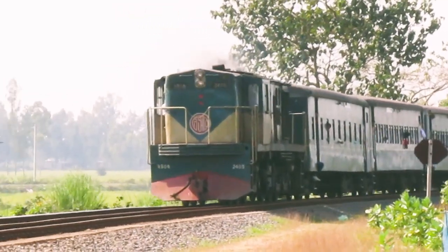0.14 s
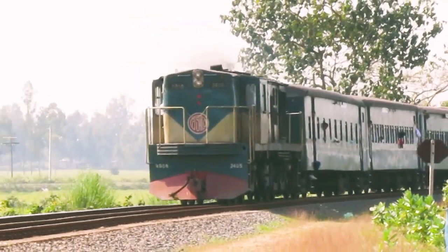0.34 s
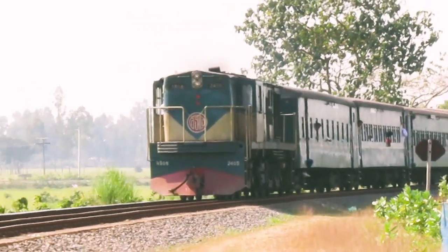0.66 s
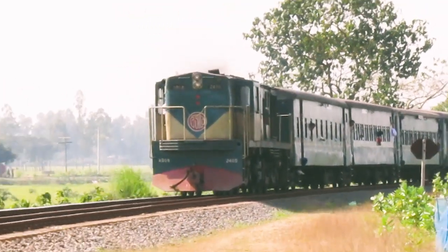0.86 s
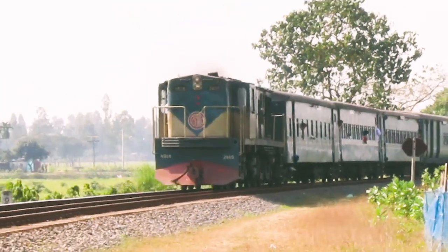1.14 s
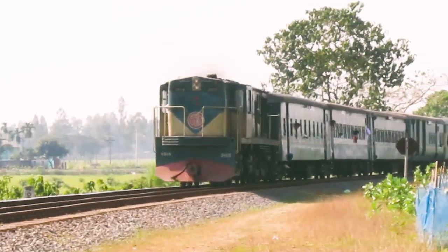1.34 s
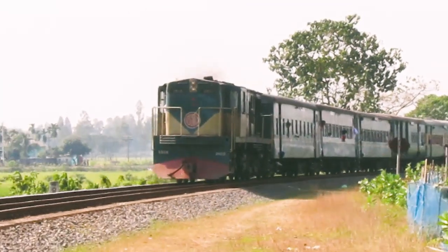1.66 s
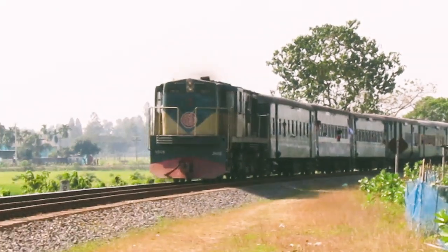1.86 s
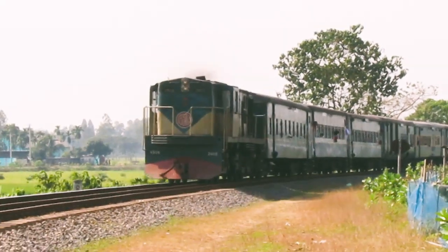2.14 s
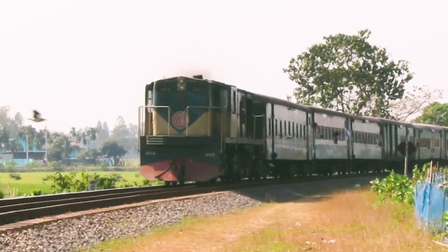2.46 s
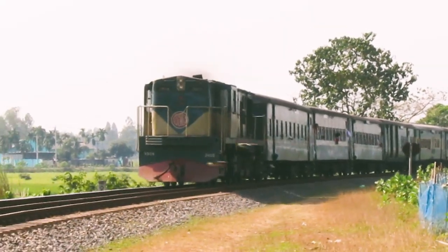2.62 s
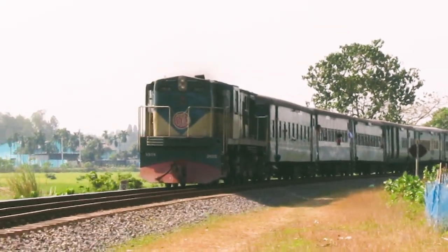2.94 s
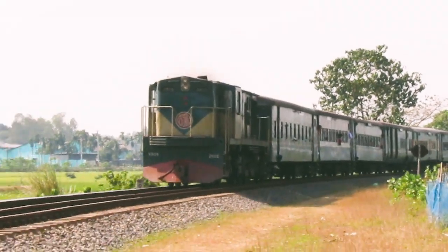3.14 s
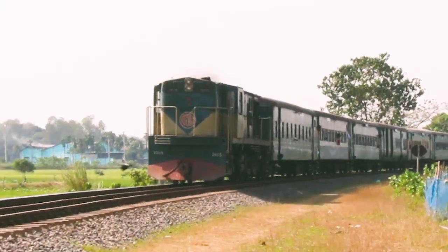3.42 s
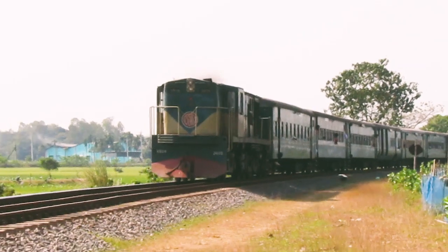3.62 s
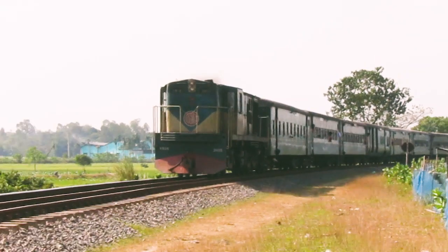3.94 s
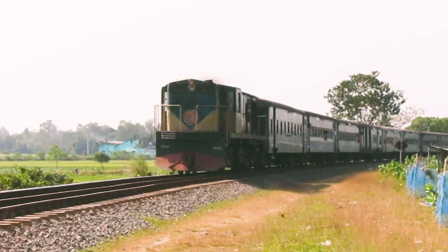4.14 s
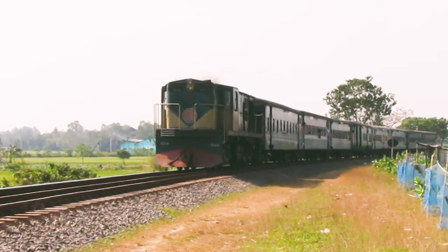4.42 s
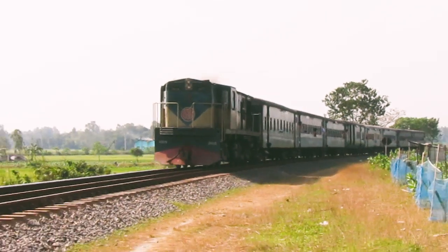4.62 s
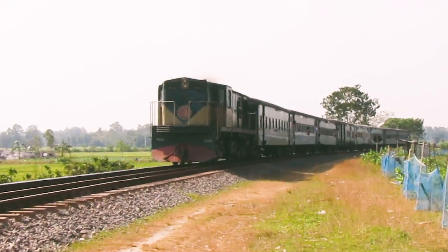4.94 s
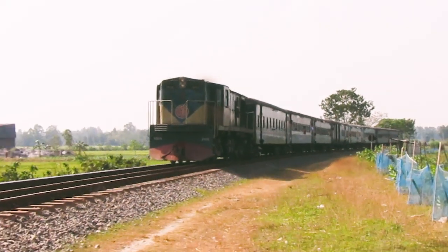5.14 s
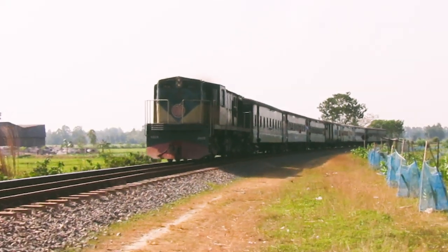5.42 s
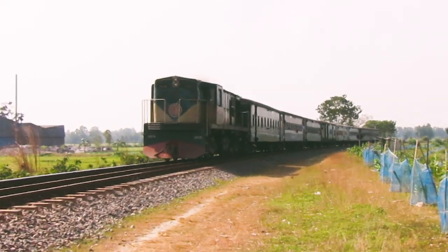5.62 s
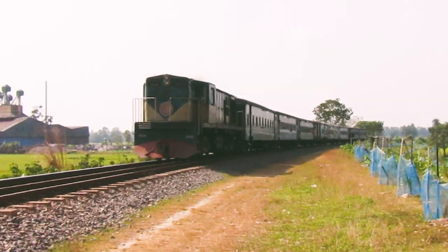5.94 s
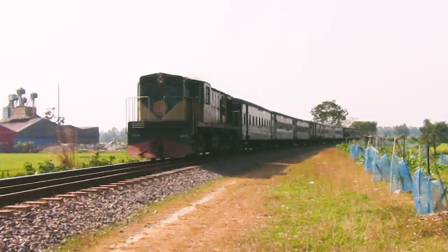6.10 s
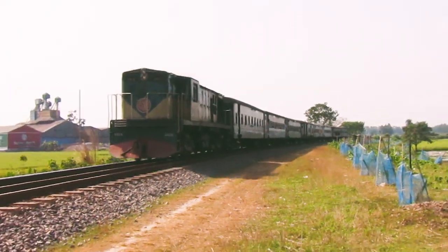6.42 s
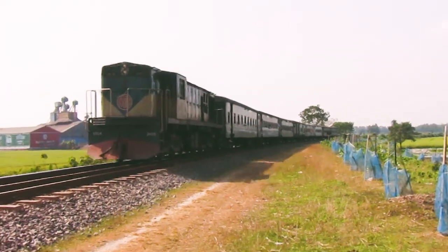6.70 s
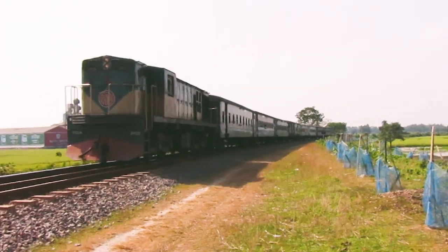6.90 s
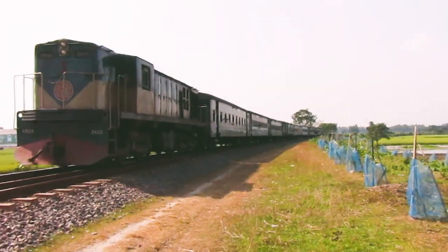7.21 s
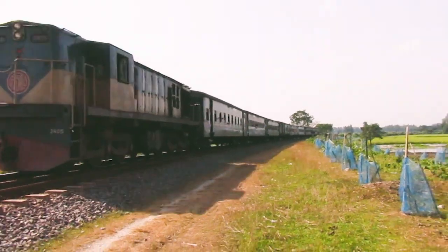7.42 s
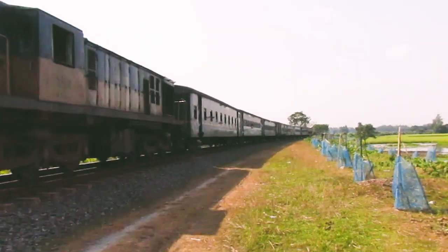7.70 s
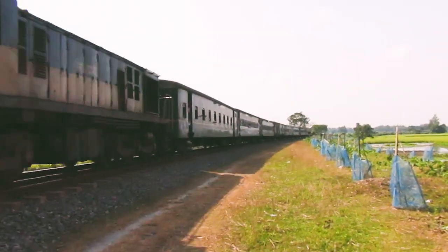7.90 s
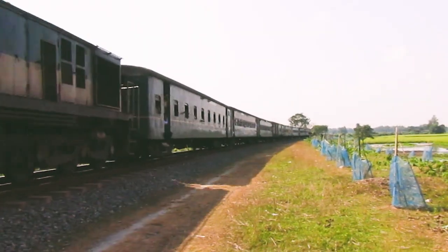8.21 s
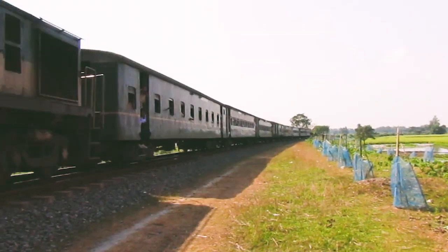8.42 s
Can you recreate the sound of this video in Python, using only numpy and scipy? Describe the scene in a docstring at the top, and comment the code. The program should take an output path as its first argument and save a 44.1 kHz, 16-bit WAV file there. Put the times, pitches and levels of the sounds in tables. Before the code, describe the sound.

Outdoors beside a curved railway, a fixed microphone about nine metres from the line hears a diesel train approach. Faint chugging, soft hiss and wavering whines come first, with two very brief clicking dropouts. Steel clanks begin, the high rail sizzle steps up, and exhaust rumble, throbs and wheel roar keep growing until the locomotive is abreast, loud and droning, at the end.

```python
"""Beside a curved railway track, the microphone 9 m off the line. A diesel locomotive with coaches starts
over 100 m away: a chug over deep exhaust rumble, a whine, wheel roar, early hiss and wavering, whining tones.
At 0.5 s and 3 s the level dips briefly with a click; between them clanks begin, and the rail sizzle steps up.
The early hiss fades; engine, roar and sizzle grow as the train nears, until it is abreast at 8.4 s.
Tones and decaying bursts make the engine, whines and blows; shaped noise makes the roar, hiss and sizzle."""
import sys
import numpy as np
from scipy import signal
from scipy.fft import rfft, irfft, next_fast_len
from scipy.io import wavfile
from scipy.ndimage import uniform_filter1d, minimum_filter1d, map_coordinates

SR = 44100
rng = np.random.default_rng(int(sys.argv[2]) if len(sys.argv) > 2 else 0)


def transcribe(signal):
    """Save signal, clipped to [-1, 1], as a 16-bit WAV file at the path in sys.argv[1]."""
    frames = np.atleast_2d(signal).T
    limited = np.clip(frames, -1, 1)
    pcm = np.round(limited * 32767).astype(np.int16)
    wavfile.write(sys.argv[1], SR, pcm)


N = 377055
T = np.arange(N) / SR  # seconds
HZ = np.fft.rfftfreq(N, 1 / SR)

# the pass: train speed, microphone's distance from the track, moment when the engine room is abreast
SPEED_M_PER_S, TRACK_M, ABREAST_S = 13.7, 9, 8.4
# the long train is at full level within CLOSE_M and has lost its far loss at FAR_M
CLOSE_M, FAR_M = 32.9, 113.6


def amp(db):
    """Decibels to gain."""
    return 10 ** (np.asarray(db) / 20)


def unit(x):
    """Scales to rms 1."""
    return x / np.sqrt(np.mean(x ** 2) + 1e-20)


def white():
    """Plain noise."""
    return rng.standard_normal(N)


def drift(per_s):
    """Slow chance of rms 1 that heads for a new value per_s times a second."""
    values = rng.standard_normal(4000)
    return unit(map_coordinates(values, [T * per_s], order=1, mode="wrap"))


def grains(per_s, spread_db):
    """Tiny impacts at random moments, at rms 1; a few are much larger than the rest."""
    sizes = amp(spread_db * np.minimum(rng.exponential(1, N), 4))
    struck = rng.random(N) < per_s / SR
    return unit(np.sign(white()) * sizes * struck)


def filtered(x, spectrum):
    """Passes x through a filter given as (Hz, dB) points."""
    hz, db = np.transpose(spectrum)
    size = next_fast_len(N + 4096)
    bins = np.fft.rfftfreq(size, 1 / SR)
    gain = amp(np.interp(np.log(bins + 1), np.log(hz), db))
    return irfft(rfft(x, size) * gain, size)[:N]


def colour(x, spectrum):
    """Gives x a spectrum, at rms 1."""
    return unit(filtered(x, spectrum))


def bell(x, centre, spread):
    """Smooth bell curve with peak 1; spread is its standard deviation."""
    return np.exp(-.5 * ((x - centre) / spread) ** 2)


def blend(a, b, share):
    """Goes from a to b as share goes from 0 to 1."""
    share = np.clip(share, 0, 1)
    return (1 - share) * a + share * b


def add(mix, s, sound):
    """Mixes a sound in at time s."""
    part = mix[max(round(s * SR), 0):][:len(sound)]
    part += sound[:len(part)]


def swells(rows):
    """Gain in dB of smooth, bell-shaped swells and sags."""
    return sum(db * bell(T, s, spread_s) for s, spread_s, db in rows)


def distance(abreast_s=ABREAST_S):
    """Metres to the microphone from the part of the locomotive that is abreast at that moment."""
    return np.hypot(SPEED_M_PER_S * (abreast_s - T), TRACK_M)


def doppler():
    """Factor on pitch: 1 far ahead, sinking as the locomotive draws level."""
    mach = SPEED_M_PER_S / 343
    closing = SPEED_M_PER_S * (ABREAST_S - T) / distance()  # share of the speed that points at the microphone
    return (1 - mach) / (1 - mach * closing)


def side_on(sharpness=1.37):
    """How far the locomotive's side faces the microphone, 0-1."""
    return (TRACK_M / distance()) ** sharpness


def approach(close_db, far_db, bend):
    """Level in dB of a sound that grows as the train comes up and holds once it is close."""
    far = np.maximum((distance() - CLOSE_M) / (FAR_M - CLOSE_M), 0)
    return close_db - far_db * far ** bend


CYCLE_HZ = 5.512  # four-stroke cycles per second, before Doppler
# exhaust level close by (dB), loss far away (dB), bend of that loss (1 = even in dB)
EXHAUST_DB, EXHAUST_FAR_DB, EXHAUST_BEND = -16, 18.5, 2.32
# Steady engine tones. Each row: multiple of the four-stroke cycle rate, relative level in dB.
ENGINE_ORDERS = [(12, -12), (16, -4.5), (19, -2.5), (21, -15), (23, -4), (26, -23), (28, -1.5), (29, -2),
                 (30, -11), (32, -9), (33, -3.5), (34, -10), (35, -10.5), (36, -8), (37, -8), (40, -6.5)]
# Cylinders that bark above the rest.
# Each row: place in the cycle 0-1, pitch in Hz before Doppler, rise time in seconds, relative level in dB.
CHUFFS = [(0.193, 242, 0.013, 3), (.52, 336.6, 0.0053, -5), (0.544, 181.5, 0.0066, 8.5),
          (.87, 154.4, 0.014, -1.5)]
# Exhaust rumble heard from ahead and from beside. Each row: frequency in Hz, relative level in dB per Hz.
RUMBLE_AHEAD = [(26, -50), (45, -27.5), (92, -5), (161, 0), (241, -7), (268, -13), (335, -9.5), (380, -23),
                (490, -63), (840, -120)]
RUMBLE_BESIDE = [(24, -61), (40, -34), (51, -30), (84, -21), (123, 1), (151, 0.5), (204, 1), (253, -9.5),
                 (381, -1), (438, -17), (520, -42), (680, -39), (1140, -120)]
# The exhaust surges and eases. Each row: centre in seconds, bell spread in seconds, gain in dB.
SURGES = [(1.45, 0.13, 1.5), (2, 0.14, 1.5), (3.5, 0.036, 0.5), (3.8, .15, -1.5), (6.05, 0.14, 1)]


def engine(tones_db=-5, chuffs_db=-6, rumble_db=-3, uneven_db=0.0, wander=0.074, throb_db=0.33,
           screened_db=-4, floor_hz=52):
    """The exhaust repeats every two crank turns: steady tones, barking cylinders and turbulent gas."""
    beside = side_on()
    cycles = np.cumsum(CYCLE_HZ * doppler()) / SR
    tones = np.zeros(N)
    for k, db in ENGINE_ORDERS:
        phase = 2 * np.pi * (k * cycles + rng.random()) + wander * drift(4.6)
        tones += amp(db) * np.cos(phase)
    chuffs = np.zeros(N)
    for place, hz, rise_s, db in CHUFFS:
        age = (cycles - place) % 1 / CYCLE_HZ  # time since this cylinder last fired
        pulse = age / rise_s * np.exp(1 - age / rise_s)
        chuffs += amp(db + uneven_db * drift(5.4)) * pulse * np.sin(2 * np.pi * hz * age)
    beat = amp(tones_db) * unit(tones) + amp(chuffs_db) * chuffs
    beat *= amp(screened_db * beside)  # the hood hides the stack
    gas = white() * amp(throb_db * drift(30))
    rumble = blend(colour(gas, RUMBLE_AHEAD), colour(gas, RUMBLE_BESIDE), beside)
    level_db = approach(EXHAUST_DB, EXHAUST_FAR_DB, EXHAUST_BEND) + swells(SURGES)
    exhaust = amp(level_db) * (beat + amp(rumble_db) * rumble)
    high_pass = signal.butter(4, floor_hz, "high", fs=SR, output="sos")
    return signal.sosfilt(high_pass, exhaust)


BLOWER_HZ = 200.4  # before Doppler
# The blower's whine. Each row: multiple of its pitch, loudest moment in seconds, level then in dB,
# loss in dB per tenfold distance.
WHINE_ORDERS = [(1, 8.9, -29.5, 56), (2, 8.52, -32.5, 65), (4, 7.3, -36.5, 22), (6, 8.73, -32.5, 50),
                (8, 9, -36, 17.5)]


def machinery(waver=0.00702, flutter=0.41, drone_db=-31, drone_hz=365, drone_width_hz=35):
    """The engine room drones through its side; the blower whines unsteadily and sinks in pitch as it passes."""
    pitch = BLOWER_HZ * doppler()
    drone = unit(irfft(rfft(white()) * bell(HZ, drone_hz, drone_width_hz), N))
    whine = np.zeros(N)
    for k, s, db, loss_db in WHINE_ORDERS:
        wobble = 1 + waver * 2 / np.sqrt(k) * drift(60)  # low tones are the least steady
        tone = np.sin(2 * np.pi * np.cumsum(k * pitch * wobble) / SR)
        tone *= 1 + flutter * drift(30)
        level_db = db - loss_db * np.log10(distance(s) / TRACK_M)
        whine += amp(level_db) * unit(tone)
    return whine + amp(drone_db) * side_on() * drone


# wheel roar level close by (dB), loss far away (dB), bend of that loss
ROAR_DB, ROAR_FAR_DB, ROAR_BEND = -24.5, 17, 1.79
# Wheel roar far off and near the microphone. Each row: frequency in Hz, relative level in dB per Hz.
ROAR_FAR = [(240, -44), (400, -10), (532, -4.5), (582, -16.5), (671, -1), (803, -5), (879, 0.5), (940, -2),
            (1310, -15), (1380, -15.5), (1540, -9.5), (1630, -17), (1740, -27), (2180, -35.5), (2400, -78),
            (3120, -82), (5280, -120)]
ROAR_NEAR = [(250, -56), (420, 0), (497, 0), (575, -10), (775, 0.5), (903, -0.5), (986, -3), (1180, -7),
             (1300, -10.5), (1380, -10), (1530, -12), (1570, -16), (1680, -14), (2090, -19), (2400, -37),
             (3120, -55), (5280, -120)]
# The roar swells and eases with the state of the rail.
# Each row: centre in seconds, bell spread in seconds, gain in dB.
ROAR_SWELLS = [(1.7, 0.24, 2), (6.15, 0.14, 1), (6.9, 0.25, -2.5)]


def wheels(near_m=21, widening=1.96, rattle=0.34, flutter_db=1.06):
    """Rough treads roll and rattle on the rail; the roar widens as the train comes near."""
    near = (near_m / distance()) ** widening
    contact = white() + rattle * grains(per_s=260, spread_db=0.5)
    contact *= amp(flutter_db * drift(45))
    roar = blend(colour(contact, ROAR_FAR), colour(contact, ROAR_NEAR), near)
    level_db = approach(ROAR_DB, ROAR_FAR_DB, ROAR_BEND) + swells(ROAR_SWELLS)
    return amp(level_db) * roar


def ring(x, share, t60):
    """Long steel answers with a thicket of narrow modes, made as a decaying noise tail."""
    t = np.arange(SR // 6) / SR
    tail = rng.standard_normal(len(t)) * amp(-60 * t / t60)
    return x + share * signal.oaconvolve(x, tail / np.linalg.norm(tail))[:N]


# The rails ring high in the sizzle. Each row: frequency in Hz, half width in Hz, relative level in dB.
RAIL_MODES = [(6140, 60, -25), (9750, 60, -11), (10460, 90, -12), (11790, 20, -20), (12300, 40, -16),
              (12376, 30, -18), (12715, 35, -21), (13400, 40, -23)]


def rail_ring():
    """Noise in the narrow, high modes of the rails."""
    shape = np.zeros(len(HZ))
    for hz, width, db in RAIL_MODES:
        shape += amp(db) / np.sqrt(width) / (1 + ((HZ - hz) / width) ** 2)
    return unit(irfft(rfft(white()) * shape, N))


# running gear hiss: level abreast (dB), loss with distance (dB per m)
GEAR_DB, GEAR_DB_PER_M = -39.5, 0.4
# rail sizzle: level close by (dB), loss far away (dB), bend of that loss
SIZZLE_DB, SIZZLE_FAR_DB, SIZZLE_BEND = -44, 13, 1.8
# the sizzle steps up as the flanges bite in the curve: moment (s), time constant (s), step (dB)
BITE_S, BITE_RISE_S, BITE_DB = 2.65, 0.054, 6.5
# Running gear hiss, rail sizzle, and a broad hiss that fades from the first dip on.
# Each row: frequency in Hz, relative level in dB per Hz.
HISS = [(1590, -20), (2700, -0.5), (3160, 0), (4200, -4), (5900, 1.5), (6340, -1), (7840, 2), (8420, 1),
        (9500, -2.5), (12500, -20), (14800, -28)]
SIZZLE = [(2700, -30), (3400, -18), (5200, -18.5), (6200, -12.5), (7000, -13.5), (7960, -9.5), (9300, -0.5),
          (10100, -0.5), (10800, 0), (11700, -7.5), (12900, -12.5), (14800, -19.5)]
EARLY_HISS = [(1000, 3), (1900, 9.5), (2400, -6.5), (3000, -0.5), (4500, -7), (6200, -4.5), (8000, -7.5),
              (10300, -5), (11500, -15), (14800, -20)]
# The gear hisses harder in the curve and on nearing.
# Each row: centre in seconds, bell spread in seconds, gain in dB.
GEAR_SWELLS = [(2.4, 0.7, 7), (4.8, 0.23, 2), (6.9, 0.14, 2.5), (8.55, 0.11, 2)]
# Flanges rub and let go, and the sizzle swells and eases.
# Each row: centre in seconds, bell spread in seconds, gain in dB.
RUBS = [(3.52, 0.029, 3), (4.05, 0.074, 1.5), (5.3, 0.11, 4), (5.65, 0.1, 7), (6.19, 0.12, 7),
        (6.55, 0.074, 7), (6.88, .15, -2), (7.36, 0.082, 4.5), (8.15, 0.19, -0.5)]


def rails(hiss_crackle=0.48, sizzle_crackle=0.66, flicker_db=1.0, early_db=-51.0, early_fade_db_per_s=75,
          ringing_db=-9):
    """The running gear hisses, and the rails carry a high, ringing sizzle ahead of the wheels."""
    gear_db = GEAR_DB - GEAR_DB_PER_M * (distance() - TRACK_M) + swells(GEAR_SWELLS)
    unbitten = .5 - .5 * np.tanh((T - BITE_S) / BITE_RISE_S)
    rail_db = approach(SIZZLE_DB, SIZZLE_FAR_DB, SIZZLE_BEND) - BITE_DB * unbitten + swells(RUBS)
    gear_contact = white() + hiss_crackle * grains(per_s=350, spread_db=1.0)
    hiss = colour(ring(gear_contact, share=0.26, t60=0.081), HISS)
    rail_contact = white() + sizzle_crackle * grains(per_s=700, spread_db=1.0)
    sizzle = colour(ring(rail_contact, share=0.33, t60=0.07), SIZZLE)
    track = amp(gear_db) * hiss + amp(rail_db) * (sizzle + amp(ringing_db) * rail_ring())
    first_start, first_end = DIPS[0][:2]
    fade_in = np.clip(T / first_end, 0, 1)  # full by the end of the first dip
    fade_db = early_fade_db_per_s * np.maximum(T - first_start, 0)
    early = amp(early_db - fade_db) * colour(white(), EARLY_HISS)
    return (early + track * fade_in) * amp(flicker_db * drift(60))


# Whining tones near 800, 1550 and 3100-3600 Hz. Each row: loudest moment in seconds,
# bell spread in seconds, pitch in Hz, glide in Hz per second, level in dB.
WHINING_TONES = [(.6, .6, 1590, 0, -54.5), (1.9, .5, 1570, 0, -50), (3.274, 0.51, 1574, 0.5, -43),
                 (7.2, .33, 797, -8, -32), (7.75, 0.09, 794, -20, -29), (8.34, 0.13, 774, -80, -30),
                 (8.2, 0.035, 3565, 0, -50), (8.03, 0.055, 1572, -40, -30.5), (8.23, .07, 1577, -60, -36),
                 (8.385, .028, 1530, 0, -32), (8.52, 0.05, 1545, -80, -36), (8.523, .06, 3090, -160, -49.5)]


def whining_tones(waver=0.009, flutter_db=2.2):
    """Whining tones waver in pitch, flutter, swell and fade, some overlapping; each is a gliding sine."""
    out = np.zeros(N)
    for s, spread_s, hz, glide, db in WHINING_TONES:
        pitch = (hz + glide * (T - s)) * (1 + waver * drift(70))
        tone = np.sin(2 * np.pi * np.cumsum(pitch) / SR) * amp(flutter_db * drift(45))
        out += amp(db) * bell(T, s, spread_s) * unit(tone)
    return out


# Heavy throbs of the exhaust. Each row: start in seconds, peak level in dB, pitch in Hz at the swell's peak.
THUMPS = [(.226, -24, 162), (.952, -24, 165), (1.128, -28, 151), (1.255, -28, 100), (1.351, -17, 152),
          (1.939, -16.5, 151), (2.58, -14.5, 154), (2.639, -10, 145), (2.933, -14.5, 166),
          (3.38, -9.5, 131), (3.491, -9, 159), (3.834, -11, 133), (4.24, -15.5, 150), (4.386, -11, 123),
          (4.55, -16, 105), (5.294, -13, 148), (6.806, -8.5, 172), (7.537, -7, 177), (7.82, -16, 153),
          (8.015, -8, 155), (8.275, -11.5, 186), (8.513, -17, 180)]


def thumps(rise_s=0.012, sag=0.045):
    """Now and then the exhaust throbs: a few deep cycles that swell, sink in pitch and die."""
    out, t = np.zeros(N), np.arange(SR // 6) / SR
    swell = (t / rise_s * np.exp(1 - t / rise_s)) ** 2
    for s, db, hz in THUMPS:
        turns = np.cumsum(hz * (1 + sag * (1 - t / rise_s))) / SR
        add(out, s, amp(db) * swell * np.sin(2 * np.pi * turns))
    return out


# Sharp ticks and spits of hiss. Each row: start in seconds, relative level in dB, centre in Hz,
# bell spread in octaves, decay t60 in seconds.
TICKS = [(.292, -47, 5830, .2, .05), (.347, -44, 1980, .1, .06), (.35, -51, 7000, .45, 0.053),
         (0.436, -44, 8000, .35, .043), (.53, -53, 4000, .15, 0.046), (5.5065, -26, 11300, 0.3, 0.038),
         (6.456, -20, 10200, .45, 0.033), (7.393, -25, 9450, 0.13, 0.018), (7.578, -25, 9700, 0.51, 0.29),
         (7.6, -30.5, 7600, .5, 0.22), (7.657, -31, 6300, 0.34, 0.2), (7.719, -32, 9950, .25, 0.14)]


def ticks(level_db=3):
    """Bright noise bursts that swell quickly and die away."""
    out, t = np.zeros(N), np.arange(SR // 2) / SR
    octave = np.log2(np.fft.rfftfreq(len(t), 1 / SR) + 1)
    for s, db, hz, spread, t60 in TICKS:
        burst = rng.standard_normal(len(t)) * amp(db - 60 * t / t60) * (1 - np.exp(-20 * t / t60))
        shape = unit(bell(octave, np.log2(hz), spread))
        add(out, s, irfft(rfft(burst) * shape, len(t))[:-500])
    return amp(level_db) * filtered(out, [(11000, 1.0), (13000, -2), (15000, -12)])


# Brief dips of the level. Each row: start in seconds, end in seconds, full depth in dB,
# opening click against the roar in dB before its filter.
DIPS = [(0.523, 0.59, -18.5, 14), (3.003, 3.07, -15, 22.5)]


def dips(share):
    """Gain of the brief dips, at a share of their full depth."""
    depth_db = sum(db * ((T > start) & (T < end)) for start, end, db, _ in DIPS)
    return amp(share * uniform_filter1d(depth_db, size=100, output=float))


def dip_fizz(fill_db=-24, return_db=-11, return_t60=0.18):
    """Each dip opens with a click, is filled with soft fizz, and ends in a fading hiss; all follow the roar."""
    roar_db = approach(ROAR_DB, ROAR_FAR_DB, ROAR_BEND)
    clicks, returns, t = np.zeros(N), np.zeros(N), np.arange(SR // 3) / SR
    for start, end, _, click_db in DIPS:
        add(clicks, start - .002, amp([click_db]))  # a single sample
        add(returns, end, amp(return_db - 60 * t / return_t60))
    soft = [(1200, -22), (2000, -1), (3800, -10), (6000, -6), (14000, -30)]
    bright = [(300, -6), (1500, -5), (2000, -2), (2500, 3), (4000, 0), (8000, -3), (15000, -14)]
    fill = amp(fill_db) * (1 - dips(share=0.77)) * colour(white(), soft)
    return amp(roar_db) * (fill + filtered(clicks, bright) + returns * colour(white(), bright))


def band(hz, width_hz):
    """Noise in one resonance, at rms 1."""
    return unit(irfft(rfft(white()) / (1 + ((HZ - hz) / width_hz) ** 2), N))


# Airy bands, mostly high treble, that come and go abruptly.
# Each row: start in seconds, end in seconds, centre in Hz, half width in Hz, level in dB.
AIRS = [(.54, 1.72, 11100, 420, -63), (1.72, 3.0, 10400, 383, -69), (2.67, 2.82, 13200, 1100, -57),
        (3.065, 4.3, 2510, 130, -74), (3.883, 4.36, 13900, 1400, -57), (6.025, 6.28, 12600, 600, -52),
        (6.416, 6.62, 12450, 450, -48)]


def airs(flicker_db=2.0, edge_s=.05):
    """Resonant bands of noise that start and stop quickly and flicker while they last."""
    out = np.zeros(N)
    for start, end, hz, width_hz, db in AIRS:
        held = np.clip(.5 + np.minimum(T - start, end - T) / edge_s, 0, 1)
        out += amp(db) * band(hz, width_hz) * held
    return out * amp(flicker_db * drift(24.86))


# Wheels and couplings knocking. Each row: start in seconds, relative level in dB, pitch in Hz.
KNOCKS = [(1.268, -27.5, 856), (2.381, -19, 890), (2.839, -11.5, 750), (2.972, -15, 778),
          (3.091, -14.5, 1040), (3.602, -9.5, 759), (3.629, -13, 1040), (4.494, -19, 886),
          (5.245, -15, 790), (5.573, -17.5, 880), (6.394, -17, 790), (6.679, -11.5, 708), (7.998, -15, 807)]
# What knocked steel rings with. Each row: multiple of the knock's pitch, relative level in dB, t60 in seconds.
STEEL = [(.72, -15, .06), (1.001, -1.5, 0.071), (1.21, -10, 0.062), (1.471, -7, 0.043)]
# Colour of the crunch. Each row: frequency in Hz, gain in dB.
CLANK = [(200, -29), (500, -3), (750, 12), (1100, 9), (1380, -18), (1580, -7), (2000, -32), (2600, -60)]


def clanks(crunch_db=-3, t60=0.07, ring_db=-3):
    """Short, dull blows on heavy steel: a crunch and a few damped modes."""
    blows, rings, t = np.zeros(N), np.zeros(N), np.arange(SR // 4) / SR
    for s, db, hz in KNOCKS:
        add(blows, s, amp(db - 60 * t / t60))
        modes = np.zeros(len(t))
        for ratio, mode_db, decay in STEEL:
            modes += amp(mode_db - 60 * t / decay) * np.sin(2 * np.pi * (hz * ratio * t + rng.random()))
        add(rings, s, amp(db) * modes)
    dull = signal.sosfilt(signal.butter(6, 1600, fs=SR, output="sos"), rings)
    return amp(crunch_db) * filtered(white() * blows, CLANK) + amp(ring_db) * dull


# the ground hollow: centre (Hz), bell spread (Hz), share lost at FAR_M
GROUND_HZ, GROUND_WIDTH_HZ, GROUND_LOSS = 516, 155, 0.71


def over_ground(x, steepness=5):
    """Sound skimming the ground cancels in a low-middle hollow that deepens with distance."""
    low_middle = irfft(rfft(x) * bell(HZ, GROUND_HZ, GROUND_WIDTH_HZ), N)
    lost = np.minimum(GROUND_LOSS * (distance() / FAR_M) ** steepness, 1)
    return x - lost * low_middle


def scene():
    """The whole train; the dips take more from the low sounds and whines than from the hiss and sizzle."""
    low = over_ground(engine() + thumps() + machinery() + wheels() + clanks()) + whining_tones()
    dipped = low * dips(share=0.71) + rails() * dips(share=0.44)
    return (dipped + dip_fizz() + airs() + ticks())[None]


EDGE_HZ = 14950  # upper band limit
# A bump and narrow hollows in the microphone's colour.
# Each row: frequency in Hz, bell spread in Hz, gain in dB.
MICROPHONE_COLOUR = [(593, 42, 4), (1390, 34, -10), (2503, 78, -9.5), (7890, 68, -12)]


def record(dry):
    """The microphone's colour, a fast limiter and the band limit."""
    colour_db = sum(db * bell(HZ, hz, spread) for hz, spread, db in MICROPHONE_COLOUR)
    heard = irfft(rfft(dry) * amp(colour_db), N)
    peak = -minimum_filter1d(-abs(heard), size=200)
    gain = uniform_filter1d(np.minimum(1, .5 / (peak + 1e-9)), size=200)
    low_pass = signal.firwin(511, EDGE_HZ, window=("kaiser", 9), fs=SR)
    return signal.oaconvolve(heard * gain, low_pass[None], "same")


dry = scene()
out = record(dry)
transcribe(out)
```